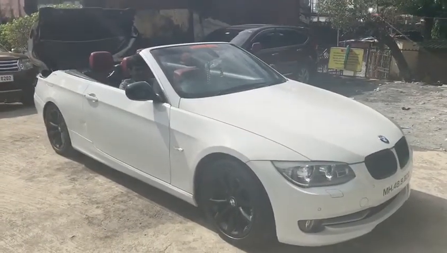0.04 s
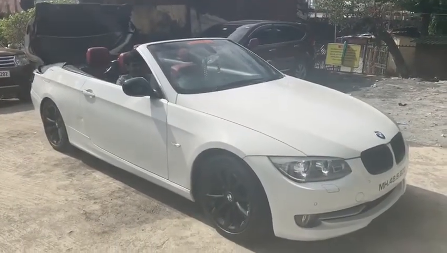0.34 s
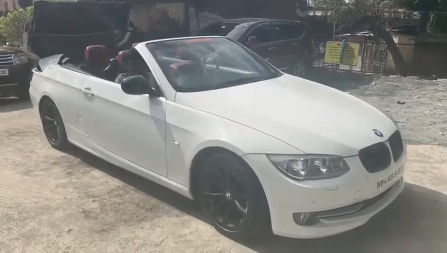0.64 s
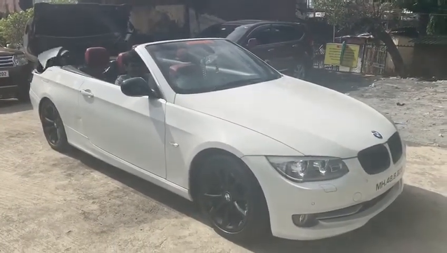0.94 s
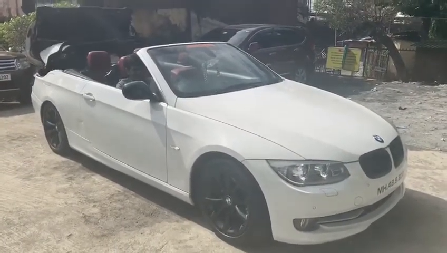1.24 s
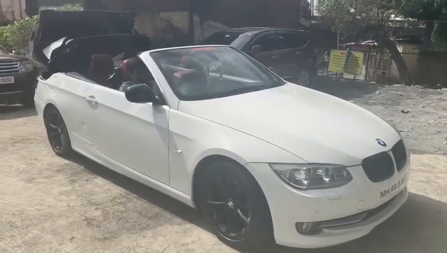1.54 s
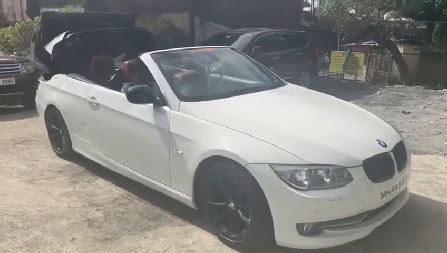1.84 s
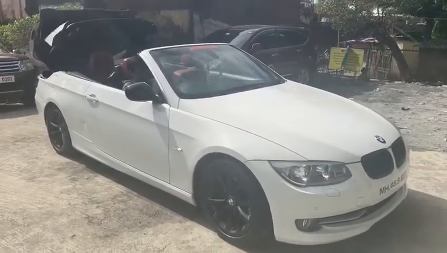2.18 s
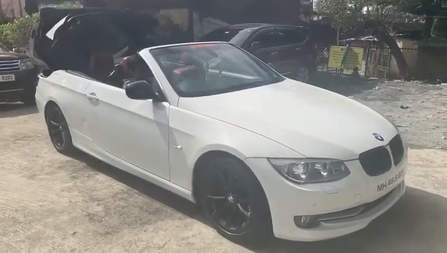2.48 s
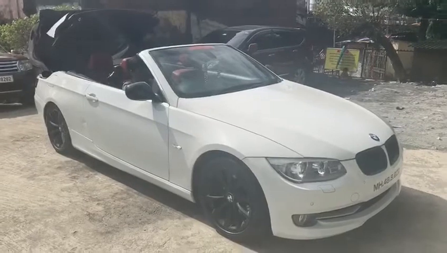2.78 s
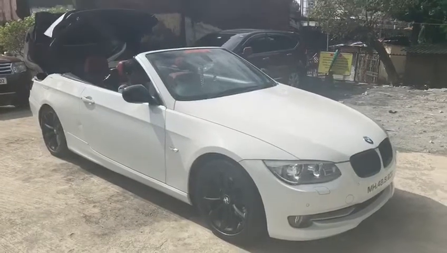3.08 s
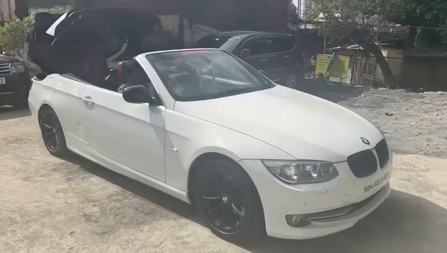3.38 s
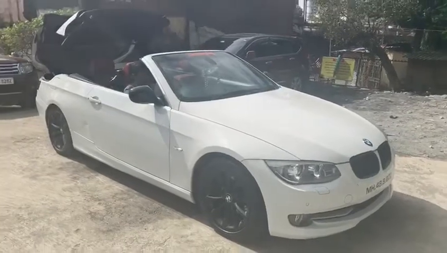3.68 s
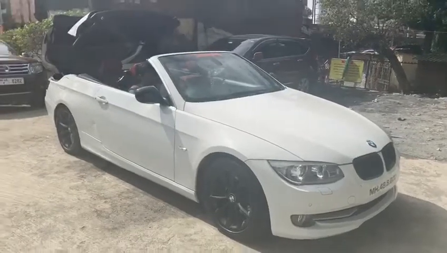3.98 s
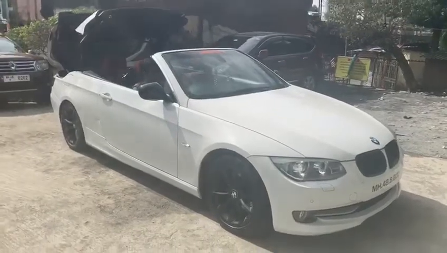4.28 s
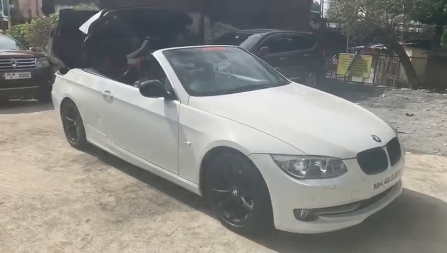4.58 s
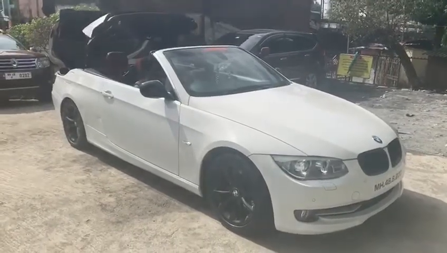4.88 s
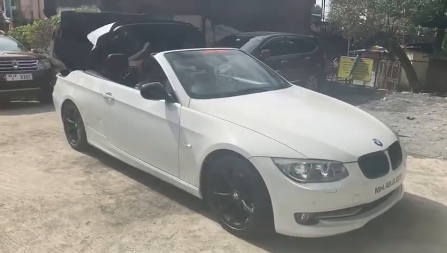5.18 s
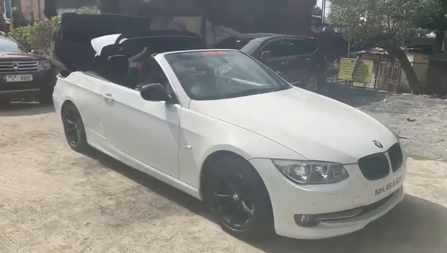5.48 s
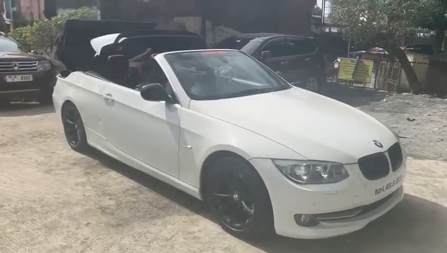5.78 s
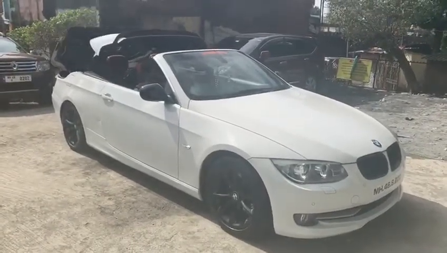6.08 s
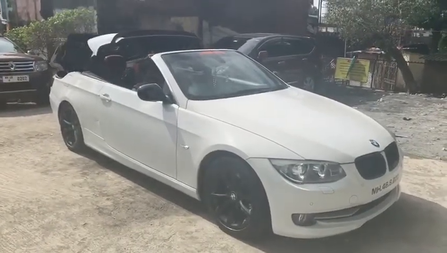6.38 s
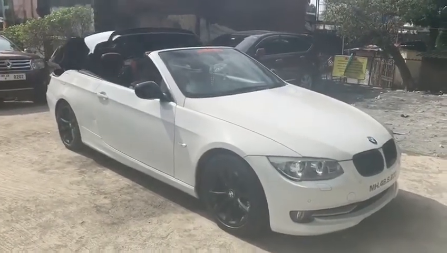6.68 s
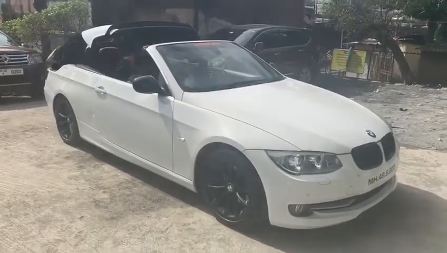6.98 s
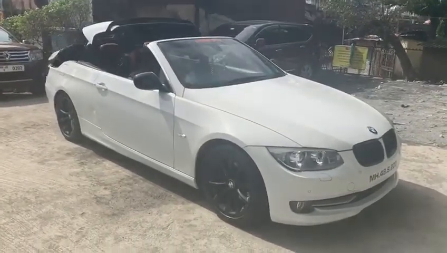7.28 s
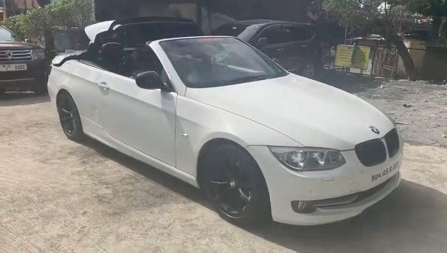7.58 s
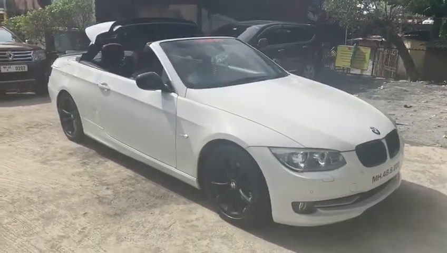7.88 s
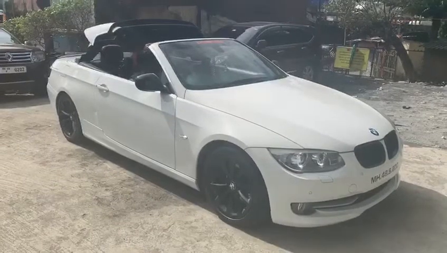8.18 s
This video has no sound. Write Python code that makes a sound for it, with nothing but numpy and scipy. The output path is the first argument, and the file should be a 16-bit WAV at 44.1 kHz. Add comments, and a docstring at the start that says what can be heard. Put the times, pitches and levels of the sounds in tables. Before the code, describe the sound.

Wind rumbles and thumps on the microphone over a faintly idling car, a soft roof motor whir and distant honking horns.

```python
"""Convertible folding its roof in the wind

A convertible idles in an open car park while wind buffets the microphone with rumble and soft thumps.
Valves and injectors tick under the engine cover, and the roof's pump whirs faintly, slowing under load,
with two brief swishes as the roof moves. Town traffic washes in; buzzing horns echo off the walls.
A thin, high hiss lies over it all."""
import sys
import numpy as np
from scipy import signal
from scipy.fft import rfft, irfft
from scipy.io import wavfile
from scipy.ndimage import uniform_filter1d

SR = 44100
rng = np.random.default_rng(int(sys.argv[2]) if len(sys.argv) > 2 else 0)


def int16_out(signal):
    """Quantize to a 16-bit WAV file."""
    q = np.round(np.clip(np.atleast_2d(signal).T, -1, 1) * 32767)
    wavfile.write(sys.argv[1], SR, q.astype(np.int16))


N = 363384

# Levels in the tables are relative: each layer sets its own gain.
# the wind's large, middling and fine eddies: (frequency [Hz], density [dB])
RUMBLE_SPECTRUM = [(8, -23), (22, -6), (42, 0.5), (62, 1.5), (85, -0.5), (120, -7), (200, -27), (400, -84)]
BUFFET_SPECTRUM = [(50, -17.5), (95, -3.5), (125, -0.5), (170, 1.5), (220, -4.5), (300, -11.5),
                   (450, -30.5), (900, -80.5)]
EDDY_SPECTRUM = [(100, -19), (200, -3), (270, 2.5), (350, -1.5), (480, -6.5), (700, -14), (1100, -23),
                 (2000, -63)]
# strength of the wind on the microphone: (time [s], level [dB])
WIND_LEVEL = [(0.0, -24), (0.52, -22.5), (0.62, -21.5), (0.76, -22), (1.04, -20), (1.36, -21.5),
              (1.68, -22), (1.735, -29), (1.8, -22), (2.05, -22), (2.32, -29.5), (2.4, -22.5), (2.72, -22),
              (2.88, -21.5), (3.12, -21.5), (4.28, -22), (4.44, -20.5), (5.52, -23.5), (5.92, -19.5),
              (6.1, -24), (6.21, -24), (6.3, -26), (7.0, -22.5), (8.2, -24)]
# swells and lulls of the large eddies alone: (time [s], half length [s], change [dB])
RUMBLE_SURGES = [(.35, .12, 4), (.65, 0.071, 5), (1.87, 0.078, -5), (2.86, 0.11, -6.5), (3.82, 0.055, -5.5),
                 (4.08, .07, -3), (5.88, .1, 2), (8.1, .2, 1)]

# left-right likeness of the background wash, hiss and swishes: (frequency [Hz], correlation [-1 to 1])
BACKGROUND_LIKENESS = [(100, 0.27), (260, 0.77), (390, 0.36), (490, 0.57), (640, 0.36), (900, 0.32),
                       (1200, 0.15), (1700, -0.14), (2300, 0.063), (3200, 0.039), (4500, 0.033),
                       (5700, 0.0038), (7400, -0.67), (8400, 0.96), (9800, 0.23)]
# stereo lean: (frequency [Hz], left minus right [dB])
STEREO_BALANCE = [(200, 1.5), (600, 0.5), (1050, 1.5), (1850, 4), (3300, 3), (5800, 0.5), (8200, -1),
                  (10000, 0)]

# the injectors in firing order, three of them nearer: (level [dB], energy decay [s])
INJECTOR_TICKS = [(3.5, 0.0042), (1.5, 0.0043), (2.5, 0.0028), (-0.5, 0.0072), (-4, 0.0056), (0, 0.0035)]
# colour that the engine cover gives the ticks: (frequency [Hz], density [dB])
COVER_SPECTRUM = [(500, -24.5), (900, -10.5), (1170, 1), (1420, -1), (1650, -8.5), (1950, -6), (2330, -8),
                  (2700, -12), (4500, -19), (5900, -20.5), (6800, -26.5), (8100, -30), (10500, -49)]
# cover panels that ring on after a tick: (frequency [Hz], width [Hz], level [dB])
PANEL_MODES = [(1091, 36, -5), (1152, 24, -1), (1181, 32, -4), (1245, 35, -6.5), (1330, 50, -1),
               (1440, 70, -5), (1665, 50, -10), (1920, 61, -6), (2313, 41, -4.5)]
# the engine's fader: (time [s], level [dB])
ENGINE_FADER = [(0, -35.5), (2.6, -34.5), (3.5, -36.5), (8.24, -36.5)]

# the roof pump's whir, sagging as the load grows: (time [s], pitch [Hz])
WHIR_PITCH = [(0, 572), (1, 586), (2.5, 623), (3.1, 582.5), (3.35, 610), (3.65, 578), (6.2, 622),
              (6.5, 583), (8.24, 603)]
# strokes in which the pump works hard: (start [s], end [s], level [dB])
HARD_STROKES = [(.75, 1.1, -45), (2.3, 2.75, -48), (2.98, 4.049, -49), (6.251, 6.55, -51)]

# the wash of town traffic: (frequency [Hz], density [dB])
WASH_SPECTRUM = [(30, 5), (200, 0), (400, 1), (490, -3.5), (640, 0.5), (930, -1.5), (1200, -1.5),
                 (1700, -2), (2350, -5), (2800, -6.5), (3500, -9), (4600, -13.5), (6500, -23.5),
                 (9000, -61)]
# a separate thin, high hiss: (frequency [Hz], density [dB])
HISS_SPECTRUM = [(3000, -22), (5400, -19), (5900, 13.5), (6350, 10), (7500, 3), (8150, 11), (8800, 7),
                 (10000, 9), (11000, -24.5)]
# the fader shared by wash and hiss: (time [s], level [dB])
BACKGROUND_FADER = [(0, -40.5), (1, -40), (2, -39.5), (4.1, -38.5), (4.4, -37), (4.65, -38.5), (5.6, -39.5),
                    (7.4, -38.5), (8.24, -40)]

# held horn tones that swell and change colour: (vehicle, [(time [s], level [dB], bell resonance [Hz])])
HONKS = [ ("a", [(.15, -53, 3100), (.4, -46, 3090), (.46, -52, 3090), (.53, -45, 3090), (.62, -54, 3090)]),
         ("b", [(.25, -48, 3400), (.55, -59, 3350), (.72, -48, 3330), (.95, -58, 3330)]),
         ("c", [(1.82, -40, 3100), (2.04, -43, 3100)]), ("d", [(1.84, -39, 3170), (1.9, -37, 3160),
         (1.96, -44, 3180)]), ("b", [(2.89, -47, 3620), (3.03, -46, 3420), (3.19, -41.5, 3420),
         (3.245, -42, 3610), (3.31, -44, 3460), (3.38, -42, 3440), (3.47, -52, 3520)]),
         ("e", [(2.86, -44, 2870), (2.91, -38, 2950), (2.98, -49, 2950), (3.1, -45, 2840),
         (3.22, -52, 2780), (3.29, -43, 2960), (3.35, -51, 2980), (3.42, -40.5, 2800), (3.55, -49, 2890),
         (3.7, -47, 2917)]), ("e", [(3.83, -36, 2770), (3.9, -34, 2784), (3.945, -46, 2900),
         (4.03, -51, 2890), (4.09, -41, 2960), (4.2, -44, 2760), (4.25, -49, 2890), (4.3, -36, 2750),
         (4.35, -41.5, 2790), (4.39, -49, 2850), (4.43, -44, 2830), (4.48, -51, 2890)]),
         ("e", [(4.51, -45, 2970), (4.56, -42, 2990), (4.68, -51, 2900)]), ("e", [(4.78, -41, 2920),
         (4.83, -39, 2860), (4.885, -38, 2760), (4.94, -53, 2850), (5.07, -48, 2760), (5.19, -53, 2750)]),
         ("e", [(5.56, -45, 2730), (5.6, -45, 2720)]), ("near", [(6.35, -30.5, 3530), (6.39, -34, 3500)]),
         ("near", [(6.553, -31, 3530), (6.578, -32, 3530), (6.592, -36, 3530), (6.61, -28, 3500),
         (6.648, -38, 3530), (6.66, -33, 3520), (6.685, -42, 3560)]), ("near", [(6.825, -35, 3550),
         (6.855, -30.5, 3500), (6.88, -43, 3500), (6.905, -29.5, 3460), (6.938, -38.5, 3610),
         (6.97, -26.5, 3450), (7.02, -26.5, 3520), (7.048, -46, 3620), (7.12, -27.5, 3460),
         (7.18, -30, 3700), (7.22, -33.5, 3770), (7.265, -24, 3690), (7.305, -27, 3590), (7.345, -25, 3670),
         (7.38, -32, 3580), (7.415, -32, 3540)])]
# each vehicle's horn note; two sag a little: (time [s], pitch [Hz])
HORN_PITCH = {"a": [(0, 441.5)], "b": [(0, 416.5)], "c": [(0, 437)], "d": [(0, 451)], "e": [(3.3, 385.8),
              (5, 384.8)], "near": [(6.7, 346.8), (7.1, 345.6), (7.4, 344.4)]}
# each vehicle's horn and its way to the microphone:
# (bell width [Hz], top [Hz], scattered power [share, capped at 1], echo [dB], left port lag [rad])
HORN_VOICES = {"a": (417, 3750, 2, -7, 1.3), "b": (478, 3950, 0.5, -3, 1.2), "c": (700, 3700, .5, -6, 1.5),
               "d": (518, 3800, 0.9, -10, 1.2), "e": (477, 3280, 0, -6.5, 1.25),
               "near": (402, 4320, 0.05, -9.5, 2)}

# the clearest thumps: (time [s], push peak [dB], slap peak [dB], slap top [Hz])
CLEAR_THUMPS = [(.606, -9, -36, 600), (.623, -8, -29, 600), (.634, -7, -31, 547), (.68, -7.5, -30, 550),
                (.695, -9, -42, 500), (.778, -9.5, -35, 500), (.83, -12, -26, 706), (.842, -12, -29, 700),
                (.901, -8, -33, 600), (.913, -7.5, -33, 600), (.997, -4, -21, 760), (1.009, -9.5, -35, 500),
                (1.043, -11, -25, 550), (1.058, -6, -24, 850), (1.074, -8.5, -31, 550),
                (1.134, -11, -42, 500), (1.197, -11, -23.5, 700), (1.219, -9, -32, 520),
                (1.28, -6.5, -30, 651), (1.315, -7.5, -39, 500), (1.433, -9.5, -35, 600),
                (1.602, -6.5, -38, 500), (1.664, -8, -38, 503), (1.714, -8.5, -34, 650),
                (1.757, -6.5, -33, 700), (1.981, -8.5, -42, 500), (3.162, -6.5, -27.5, 750),
                (3.346, -8, -31, 700), (3.947, -6.5, -32, 650), (5.25, -11, -36, 500),
                (6.093, -9, -32, 550), (6.141, -0.5, -17, 904), (6.157, -9, -25, 1000),
                (6.174, -6, -32, 700), (7.135, -6.5, -40, 500), (7.146, -11, -25, 800),
                (7.158, -1.5, -19.5, 890), (7.163, -12, -20.5, 446), (7.202, -4.5, -22.5, 800),
                (7.226, -5, -28, 550), (7.302, -10, -38, 550)]

# swishes while the roof moves: (peak time [s], half length [s], level [dB])
ROOF_SWISHES = [(1.6, .04, -46), (4.41, .075, -47)]
# their colour: (frequency [Hz], density [dB])
SWISH_SPECTRUM = [(2400, -25), (3400, -3), (4100, 0), (4500, -2), (5400, -29)]


def amp(db):
    """Decibels to gain."""
    return 10 ** (np.asarray(db) / 20)


def unit(x):
    """Scales to rms 1."""
    return x / np.sqrt(np.mean(x ** 2) + 1e-20)


def at_hz(points, hz):
    """Reads a spectrum on a log-frequency axis."""
    f, value = np.transpose(points)
    return np.interp(np.log(hz + 1), np.log(f + 1), value)


def over_time(points):
    """Reads an automation curve at every sample."""
    return np.interp(np.arange(N) / SR, *np.transpose(points))


def hump(s, half):
    """A smooth rise and fall of height 1 around time s."""
    return np.exp(-((np.arange(N) / SR - s) / half) ** 2)


def add(mix, s, sound):
    """Mixes a sound in at time s."""
    part = mix[..., max(round(s * SR), 0):][..., :sound.shape[-1]]
    part += sound[..., :part.shape[-1]]


def wander(rate_hz):
    """Smooth random modulation of rms 1, rolled off above the rate."""
    hz = np.fft.rfftfreq(N, 1 / SR)
    return unit(irfft(rfft(rng.standard_normal(N)) / (1 + (hz / rate_hz) ** 4), N))


def noise_pair(spectrum, likeness, balance=((1, 0),)):
    """Coloured noise at the microphone's two ports, partly alike; their mean has rms 1."""
    hz = np.fft.rfftfreq(N, 1 / SR)
    mid, side = rfft(rng.standard_normal((2, N))) * amp(at_hz(spectrum, hz))
    correlation = np.clip(at_hz(likeness, hz), -.999, .999)
    sign = np.array([[1], [-1]])
    ports = np.sqrt(1 + correlation) * mid + sign * np.sqrt(1 - correlation) * side
    pair = irfft(ports * amp(sign * at_hz(balance, hz) / 2), N)
    return pair / pair.mean(0).std()


def band(x, lo_hz, hi_hz, order=2):
    """Causal band-pass."""
    return signal.sosfilt(signal.butter(order, [lo_hz, hi_hz], "band", fs=SR, output="sos"), x)


def yard_echo(x, t60=.9, delay_s=0.023, echoes_per_s=900):
    """Scattered echoes from walls and parked cars, different at each port."""
    t = np.arange(SR) / SR
    taps = rng.standard_normal((2, SR)) * (rng.random((2, SR)) < echoes_per_s / SR)
    taps *= amp(-60 * t / t60) * (t > delay_s)
    taps /= np.linalg.norm(taps, axis=1, keepdims=True)
    return signal.fftconvolve(x[None], taps, axes=1)[:, :N]


def gust_db(breeze_db=-22):
    """How far the wind is above its usual breeze, at every sample."""
    return over_time(WIND_LEVEL) - breeze_db


def wind(settle_db_per_s=0.22):
    """Large eddies rumble at the ports, middling ones buffet them, fine ones come in short bursts."""
    gust, turbulence = gust_db(), wander(40)
    # the weight shifts slowly from the middling eddies to the large ones
    settling = settle_db_per_s * (N / 2 - np.arange(N)) / SR
    surge = sum(db * hump(s, half) for s, half, db in RUMBLE_SURGES)
    rumble_db = -24.5 + 1.43 * gust + surge - settling + 0.8 * turbulence
    buffet_db = -26 + 0.52 * gust + settling + 1.88 * turbulence
    eddy_db = -34.5 + 0.52 * gust + 3 * turbulence
    rumble = noise_pair(RUMBLE_SPECTRUM, likeness=[(50, 0.93)]) * amp(rumble_db)
    buffet = noise_pair(BUFFET_SPECTRUM, likeness=[(110, 0.93), (220, 0.99)]) * amp(buffet_db)
    eddies = noise_pair(EDDY_SPECTRUM, likeness=[(300, 1.0)]) * amp(eddy_db)
    return rumble + buffet + eddies


def engine(idle_rpm=680, first_tick_s=.0191, scatter_db=0.7, jitter_s=.00008,
           valve_db=-8, valve_lead_s=0.0071, valve_decay_s=0.0055, ring_db=-10):
    """Six cylinders idle: at each firing a valve taps, then an injector ticks and rings the cover."""
    t = np.arange(SR // 20) / SR
    energy, panels = np.zeros((2, N))
    ring = sum(amp(db) * np.exp(-np.pi * width * t) * np.sin(2 * np.pi * (hz * t + rng.random()))
               for hz, width, db in PANEL_MODES)
    cycle_s = 2 * 60 / idle_rpm  # each cylinder fires once in two turns
    firings = np.arange(first_tick_s, N / SR, cycle_s / len(INJECTOR_TICKS))
    for k, s in enumerate(firings):
        harder, later = rng.standard_normal(2)
        db, decay_s = INJECTOR_TICKS[k % len(INJECTOR_TICKS)]
        force = amp(db + scatter_db * harder)
        add(energy, s, force ** 2 * np.exp(-t / decay_s))
        add(energy, s - valve_lead_s, amp(valve_db) ** 2 * np.exp(-t / valve_decay_s))
        add(panels, s + jitter_s * later, force * ring)
    # each strike takes a few milliseconds to spread over the cover's many dense modes
    envelope = np.sqrt(abs(uniform_filter1d(energy, size=110)))
    cover = noise_pair(COVER_SPECTRUM, [(1200, 1.0), (2500, .45), (5000, 0.16)], STEREO_BALANCE)
    ringing = amp(ring_db) * unit(band(panels, 900, 2800))
    left, right = cover * envelope + ringing * amp([[1], [-1]])
    ports = np.array([np.roll(left, 4), right])  # the sound reaches the left port a little later
    return amp(over_time(ENGINE_FADER)) * ports


def roof_pump(base_db=-51.5, swell_s=.12, waver=0.0198, second_order_db=-4, direct=0.36):
    """The pump hums on its second and third orders; its speed sags and recovers with the load."""
    t = np.arange(N) / SR
    strokes = sum(amp(db) * np.clip(np.minimum(t - start, end - t) / swell_s, 0, 1)
                  for start, end, db in HARD_STROKES)
    hz = over_time(WHIR_PITCH) * (1 + waver * wander(34.8))
    phase = 2 * np.pi * np.cumsum(hz) / SR
    tone = unit(np.sin(phase) + amp(second_order_db) * np.sin(phase * 2 / 3))
    whir = (amp(base_db) + strokes) * tone
    return direct * whir + yard_echo(whir)


def traffic_and_hiss(wash_db=-1.5, hiss_db=-16, wash_swell_db=0.7, hiss_swell_db=1.4):
    """A diffuse traffic wash, plus a separate thin, high hiss peaking near 6 and 8 kHz."""
    wash = noise_pair(WASH_SPECTRUM, BACKGROUND_LIKENESS, STEREO_BALANCE)
    wash /= band(wash.mean(0), 1000, 2500, order=4).std()  # the mids set its level
    hiss = noise_pair(HISS_SPECTRUM, BACKGROUND_LIKENESS, STEREO_BALANCE)
    wash *= amp(wash_db + wash_swell_db * wander(9))
    hiss *= amp(hiss_db + hiss_swell_db * wander(18))
    return amp(over_time(BACKGROUND_FADER)) * (wash + hiss)


def horn_bell(partials_hz, bell_hz, width_hz, leak=.06, tilt_db_per_octave=10.5):
    """Harmonic gains at constant power: the bell resonates, leaks a little and favours the highs."""
    resonance = 1 / (1 + (2 * (partials_hz - bell_hz) / width_hz) ** 2)
    gains = (leak + resonance) * amp(tilt_db_per_octave * np.log2(partials_hz / bell_hz))
    return gains * np.sqrt(2 / np.sum(gains ** 2, axis=0))


def horns(direct_db=-0.5, lowest_hz=2600, jitter=0.0018, flutter_hz=30, sway_rad=0.42, fade_s=0.011):
    """A buzzing diaphragm sounds a few harmonics through its bell; shifting paths make them flutter."""
    direct, echo_send = np.zeros((2, N)), np.zeros(N)
    paths = (wander(flutter_hz) + 1j * wander(flutter_hz)) / np.sqrt(2)
    waver = 1 + jitter * wander(35)
    sway = sway_rad * wander(flutter_hz)
    for vehicle, curve in HONKS:
        width_hz, top_hz, scatter, echo_db, lag_rad = HORN_VOICES[vehicle]
        scatter = min(scatter, 1)
        times, levels_db, bells_hz = np.transpose(curve)
        t = np.arange(times[0], times[-1], 1 / SR)
        span = round(t[0] * SR) + np.arange(len(t))
        hz = np.interp(t, *np.transpose(HORN_PITCH[vehicle]))
        phase = 2 * np.pi * np.cumsum(hz * waver[span]) / SR
        left_lag = np.outer([1, 0], lag_rad + sway[span])
        harmonics = np.arange(int(lowest_hz / hz[0]) + 1, int(top_hz / hz[0]) + 1)
        gains = horn_bell(harmonics[:, None] * hz, np.interp(t, times, bells_hz), width_hz)
        blast = np.zeros((2, len(t)))
        for k, gain in zip(harmonics, gains):
            # each harmonic takes its own paths to each port
            flutter = paths[rng.integers(0, N // 2, size=(2, 1)) + np.arange(len(t))]
            arrival = np.sqrt(1 - scatter) + np.sqrt(scatter) * flutter
            blast += gain * (arrival * np.exp(1j * (k * phase - left_lag))).real
        fades = np.clip(np.minimum(t - t[0], t[-1] - t) / fade_s, 0, 1)
        blast *= amp(np.interp(t, times, levels_db)) * fades
        add(direct, t[0], amp(direct_db) * blast)
        add(echo_send, t[0], amp(echo_db) * blast[0])
    echo = yard_echo(band(echo_send, 2000, 3550, order=4), t60=1.2)
    return (direct + echo) * amp([[0.9], [-0.9]])  # a touch to the left


def puffs(breeze_rate_hz=1.6, push_db=-15, slap_db=-41, top_hz=664, candidates=200):
    """Small random thumps, more frequent and harder in a gust: rows like those of CLEAR_THUMPS."""
    place, chance = rng.random((candidates, 2)).T
    gust = gust_db()[(place * N).astype(int)]
    rows = np.transpose([place * N / SR, push_db + gust, slap_db + gust, np.full(candidates, top_hz)])
    odds = breeze_rate_hz * amp(gust) * N / SR / candidates
    return list(rows[chance < odds])


def thumps(push_trim_db=-6, slap_trim_db=6, push_s=0.0041, slap_s=0.0023, usual_push_db=-9):
    """Each thump is a dull slap with a slower push of air and no ring; big ones come in clusters."""
    out, t = np.zeros(N), np.arange(SR // 10) / SR
    for s, push_db, slap_db, top_hz in list(CLEAR_THUMPS) + puffs():
        low, mid = rng.standard_normal((2, len(t)))
        stretch = amp(0.37 * (push_db - usual_push_db))  # harder ones last longer and reach deeper
        push = band(low * t * np.exp(-t / (push_s * stretch)), 60 / stretch, 270, order=3)
        slap = band(mid * t * np.exp(-t / (slap_s * stretch)), 300, top_hz, order=4)
        add(out, s - .003, amp(push_db + push_trim_db) * push / abs(push).max())
        add(out, s - .002, amp(slap_db + slap_trim_db) * slap / abs(slap).max())
    return out


def roof_swishes():
    """Soft, high swishes swell and fade while the roof moves."""
    envelope = sum(amp(db) * hump(s, half) for s, half, db in ROOF_SWISHES)
    return noise_pair(SWISH_SPECTRUM, BACKGROUND_LIKENESS, STEREO_BALANCE) * envelope


def scene():
    """Wind close by, the car a few steps away, the street beyond."""
    return wind() + engine() + roof_pump() + traffic_and_hiss() + horns() + thumps() + roof_swishes()


def record(dry):
    """A steep low-pass takes the top treble off the mix."""
    low_pass = signal.firwin(511, cutoff=10800, window=("kaiser", 9), fs=SR)
    return signal.oaconvolve(dry, low_pass[None], "same")


dry = scene()
out = record(dry)
int16_out(out)
```